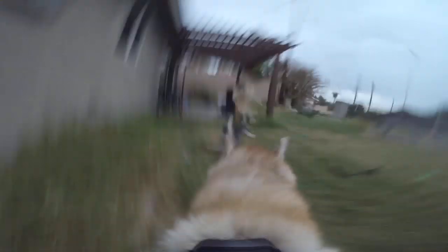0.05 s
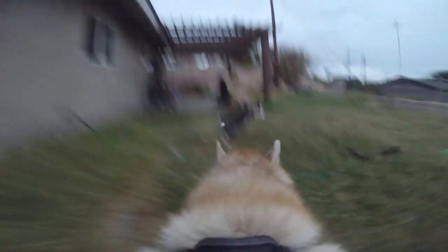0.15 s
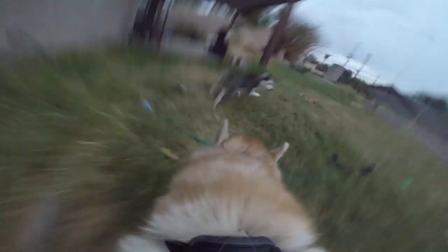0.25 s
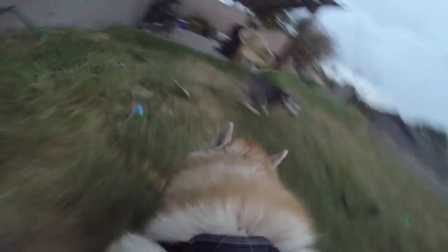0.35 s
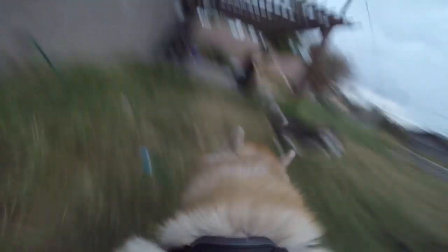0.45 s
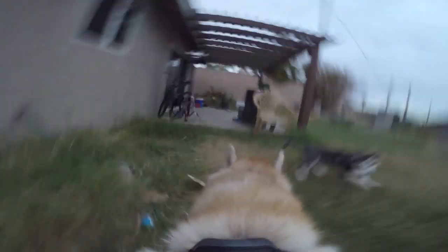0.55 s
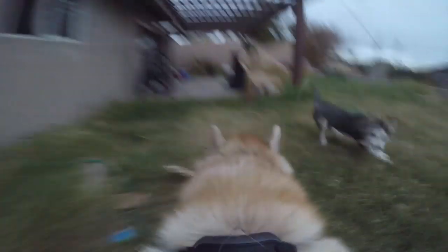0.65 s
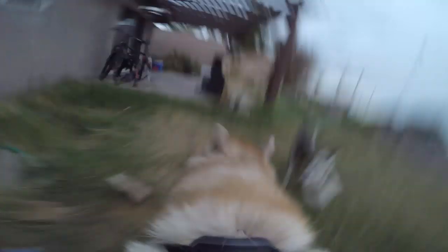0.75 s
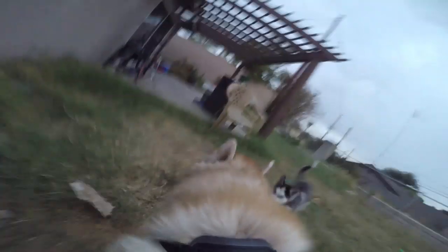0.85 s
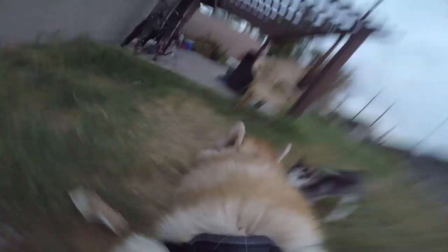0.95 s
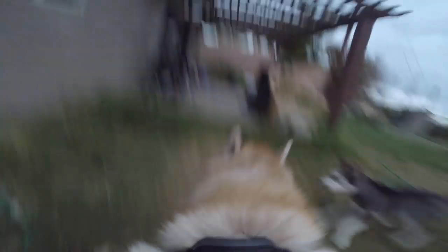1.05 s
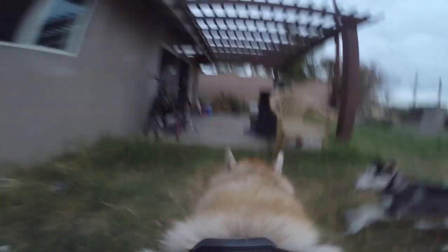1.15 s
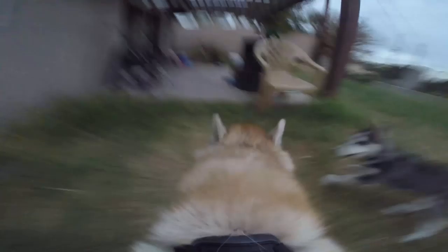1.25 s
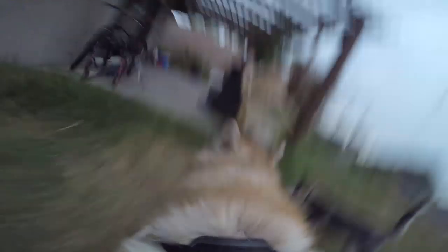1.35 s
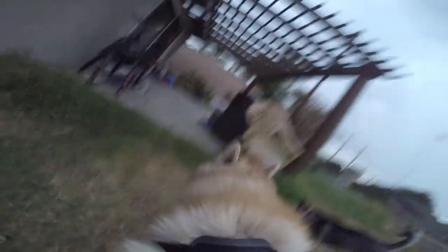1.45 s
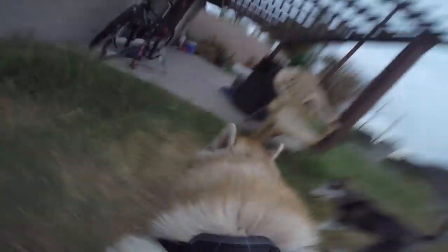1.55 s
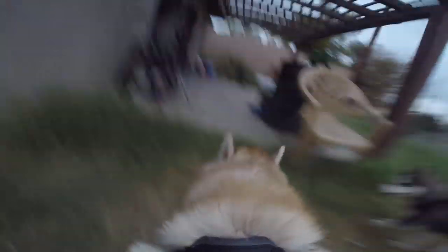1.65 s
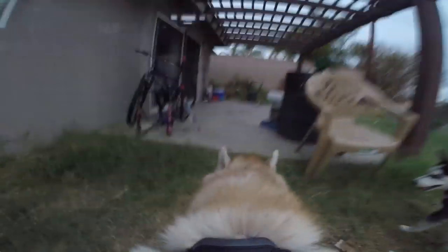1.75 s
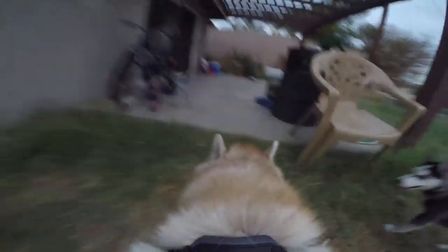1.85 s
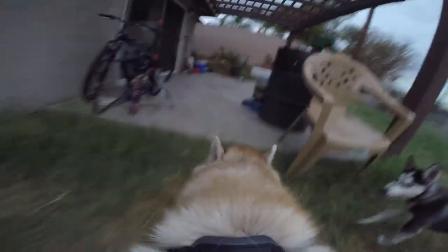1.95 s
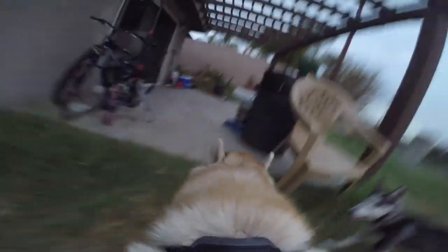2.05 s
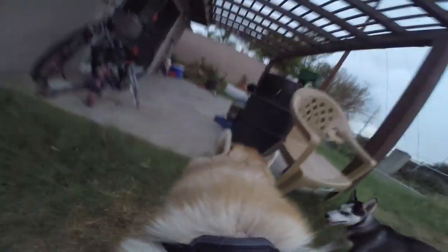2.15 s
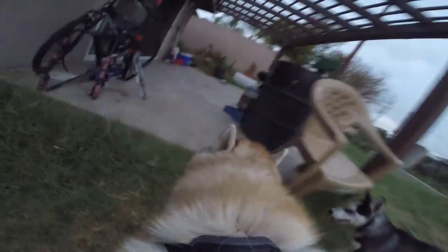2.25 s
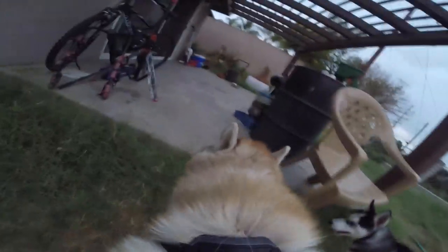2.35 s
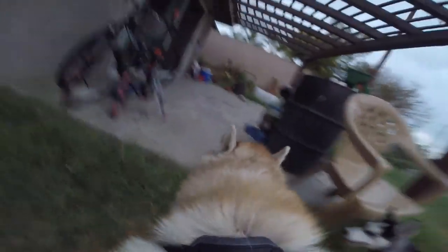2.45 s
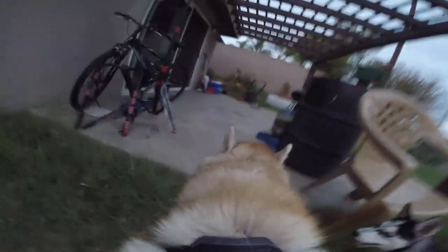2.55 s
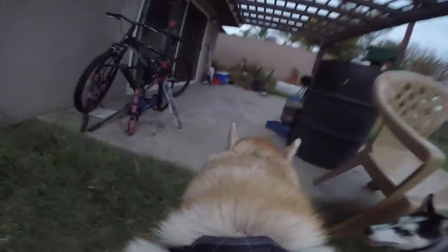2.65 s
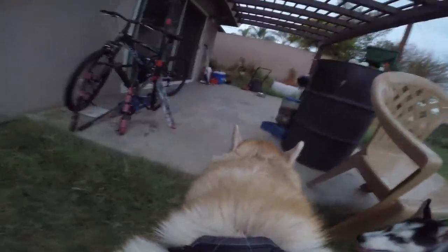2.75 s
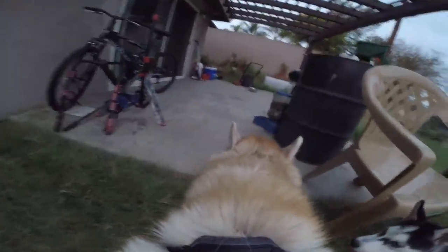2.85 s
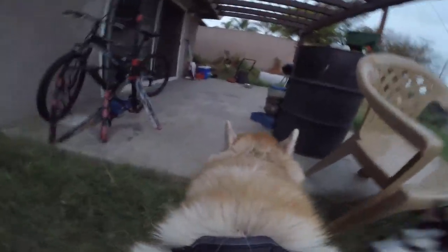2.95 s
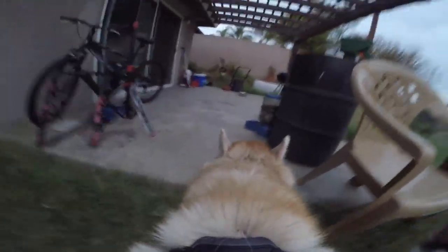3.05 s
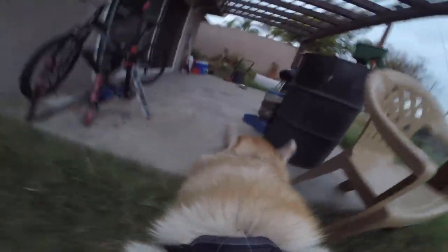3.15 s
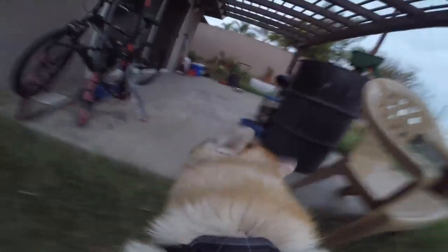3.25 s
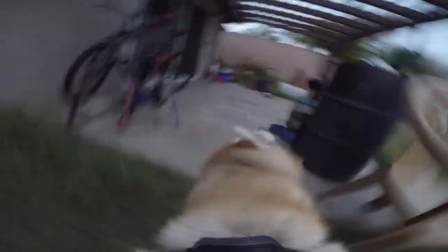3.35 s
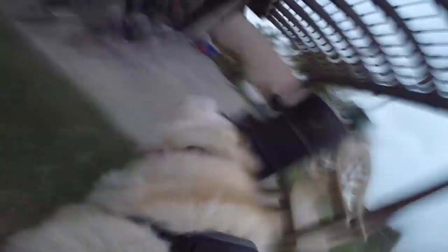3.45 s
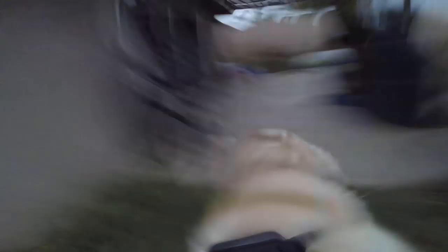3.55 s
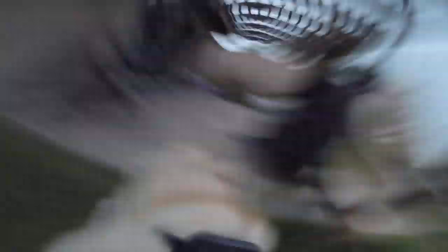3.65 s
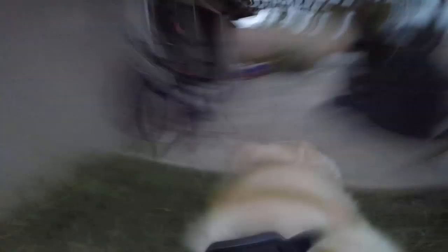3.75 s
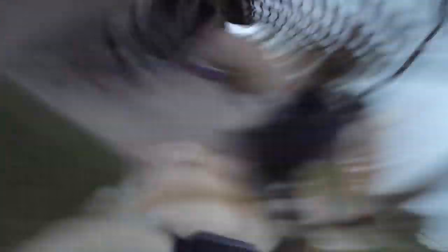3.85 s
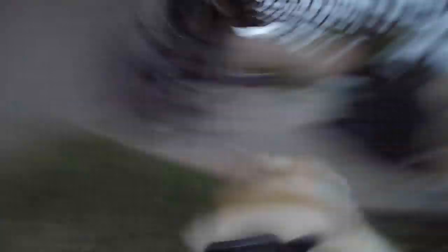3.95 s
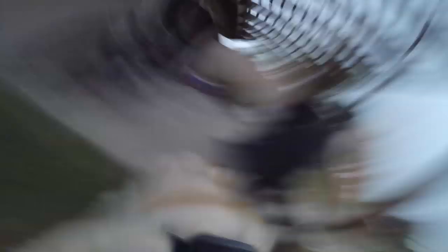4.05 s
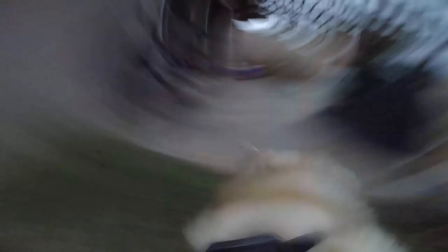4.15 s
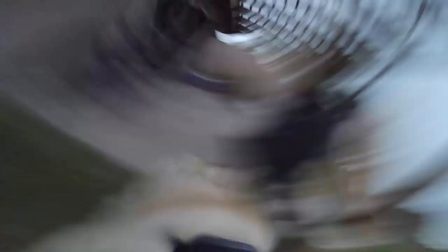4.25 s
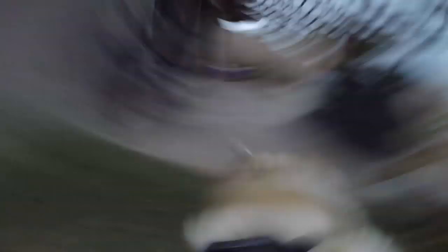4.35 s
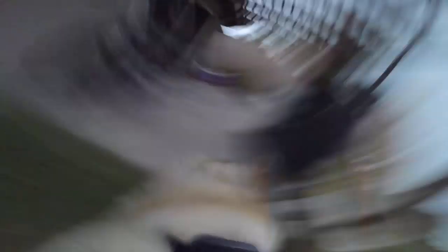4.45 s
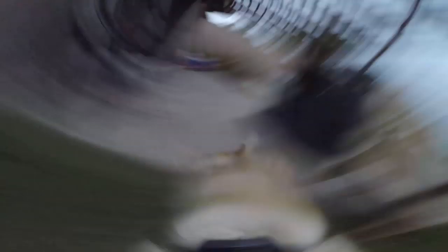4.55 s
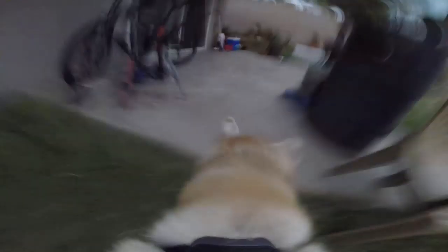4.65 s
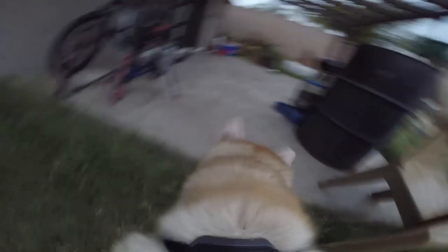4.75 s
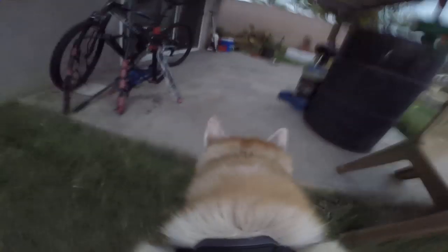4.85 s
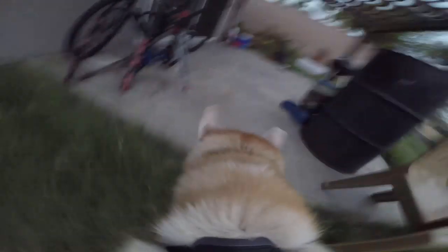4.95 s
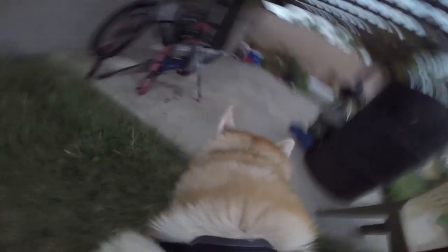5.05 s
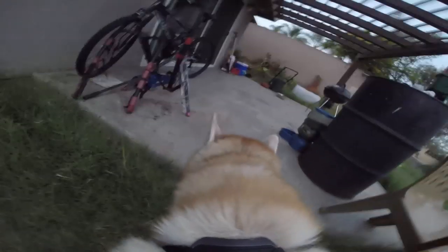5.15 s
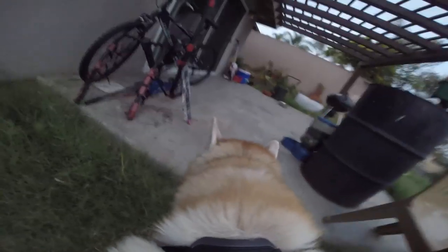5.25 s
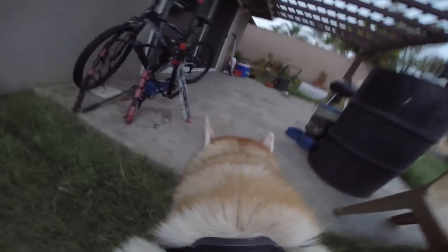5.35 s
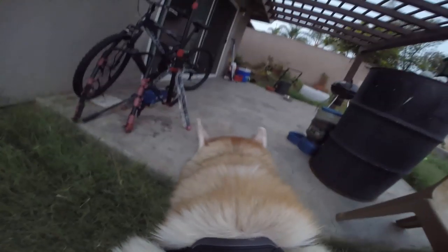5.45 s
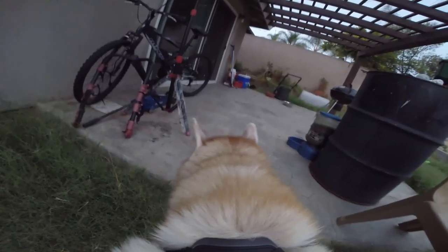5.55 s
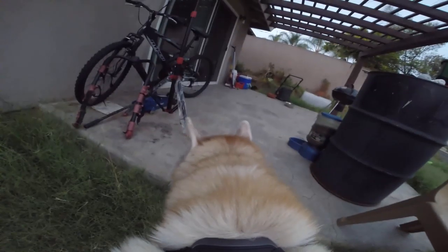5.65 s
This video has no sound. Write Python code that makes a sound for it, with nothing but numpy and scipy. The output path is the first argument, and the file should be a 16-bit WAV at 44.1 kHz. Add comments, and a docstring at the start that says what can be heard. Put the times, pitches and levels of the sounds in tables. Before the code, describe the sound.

Hard plastic knocks and light metal clinks at a dog's stride, a near-quiet pause, then a rapid harness-rattling body shake that quickly settles.

```python
"""Loose camera mount on a dog's harness, knocking on its plastic case right at the microphone, out on a lawn.
The dog runs, stops, then shakes itself: each blow is a click through damped case modes and sets a steel
fitting ringing. Buckles and rings clink as lighter clicks and slide over the case as swells of tiny contacts.
Behind them: grass and fur rustle, air buffeting and rushing on the case, low thuds and one swish, all shaped
noise; faint taps of loose parts; and scattered reflections of the hardware from ground and house wall."""
import sys
import numpy as np
from scipy import signal
from scipy.io import wavfile
from scipy.ndimage import uniform_filter1d, minimum_filter1d

SR = 44100
rng = np.random.default_rng(int(sys.argv[2]) if len(sys.argv) > 2 else 0)


def file_out(sig):
    """Save sig as 16-bit WAV at sys.argv[1]."""
    # one column per channel
    cols = np.atleast_2d(sig).T
    # limit, then scale
    lim = np.clip(cols, -1, 1)
    pcm = np.round(lim * 32767).astype(np.int16)
    wavfile.write(sys.argv[1], SR, pcm)


N = 251189
T = np.arange(N) / SR
CUTOFF_HZ = 10950     # top of the range the camera keeps, owing to its low sampling rate
CONTACT_HZ = 18000    # treble edge of a blow of 0 dB brightness; softer blows push it down


def from_db(db):
    """Decibels to gain."""
    return 10 ** (np.asarray(db) / 20)


def rms(x):
    """Root mean square."""
    return np.sqrt(np.mean(x ** 2) + 1e-20)


def add(track, s, sound):
    """Mix a sound into the track at time s."""
    at = max(round(s * SR), 0)
    track[at:at + len(sound)] += sound[:N - at]


def lowpass(x, hz):
    """Second-order treble cut."""
    return signal.sosfilt(signal.butter(2, hz, fs=SR, output="sos"), x)


def bandpass(x, low_hz, high_hz):
    """Keep what lies between two frequencies."""
    return signal.sosfilt(signal.butter(2, [low_hz, high_hz], "band", fs=SR, output="sos"), x)


def ring(force, hz, t60):
    """A unit click sets a sine of height 1 ringing; it falls 60 dB in t60 seconds."""
    r = np.exp(-np.log(1000) / (t60 * SR))
    w = 2 * np.pi * hz / SR
    return signal.lfilter([0, np.sin(w)], [1, -2 * r * np.cos(w), r * r], force + 1e-18)


def resonance(force, hz, width):
    """Two-pole band-pass with gain 1 on top."""
    r = np.exp(-np.pi * width / SR)
    feed = np.array([1, 0, -1]) * (1 - r * r) / 2
    return signal.lfilter(feed, [1, -2 * r * np.cos(2 * np.pi * hz / SR), r * r], force + 1e-18)


def disperse(force, relative_width=0.63):
    """Bending waves carry the highs faster than the lows, so a click arrives smeared over a millisecond or two."""
    for hz in (950, 1500, 2900, 3300, 4800, 8000):
        force = force - 2 * resonance(force, hz, hz * relative_width)   # an all-pass
    return force


def body(force, modes, bright_db, scatter_db):
    """Damped modes answer a force, neighbours in opposite senses; brightness lifts those above the lowest."""
    out, force = 0, disperse(force)
    for k, (hz, width, db) in enumerate(modes):
        upper = np.interp(hz, [1000, 1500, 2800, 9000], [0, .5, 1, 1.35])   # share of the brightness
        mode_db = db + bright_db * upper + scatter_db * rng.standard_normal()
        out = out + (-1) ** k * from_db(mode_db) * resonance(force, hz, width)
    return out


def shift_modes(modes, detune):
    """Another spot of the case is touched: each mode moves by about this share of its frequency."""
    return [(hz * (1 + detune * rng.standard_normal()), width, db) for hz, width, db in modes]


def blows(rows, modes, hard_db, scatter_db, grit, grit_s, detune=0.011):
    """Each blow is a click followed by a brief, bright grinding; where it lands shifts the modes a little."""
    out, t = np.zeros(N), T[:SR // 20]
    attack = round(.006 * SR)   # the level is set over the first 6 ms
    for s, level_db, bright_db in rows:
        force = grit * np.diff(rng.standard_normal(len(t) + 1)) * np.exp(-t / grit_s)
        force[0] += 1
        force = lowpass(force, min(CONTACT_HZ * from_db(bright_db / 2), .45 * SR))
        sound = body(force, shift_modes(modes, detune), bright_db + hard_db, scatter_db)
        add(out, s, from_db(level_db) * sound / rms(sound[:attack]))
    return out


def drift(per_s):
    """Random wander between knots, per_s of them a second; rms 1."""
    knots = rng.standard_normal(400)
    wander = np.interp(T * per_s % 399, np.arange(400), knots)
    return wander / rms(wander)


def banded_noise(spectrum, patchy_db, flicker_per_s):
    """Half-octave bands of noise, each flickering partly on its own; rms 1."""
    points, out, together = np.array(spectrum), 0, drift(flicker_per_s)
    edges = 20 * 2 ** np.arange(0, 9.6, .5)
    white = rng.standard_normal((2, N))   # neighbouring bands draw on different noise
    for k, (low, high) in enumerate(zip(edges, edges[1:])):
        band = bandpass(white[k % 2], low, high)
        db = np.interp(np.log(low * high) / 2, np.log(points[:, 0]), points[:, 1])
        flicker_db = patchy_db * (together + drift(flicker_per_s))
        out = out + band * from_db(db + flicker_db)
    return out / rms(out)


# the dog runs, then shakes itself and settles: [from t/s, to t/s]
MOVING_SPANS = [(0, 1.87), (3.35, 5.3)]


def moving(s):
    """True while the dog is in motion."""
    return np.any([(s >= start) & (s < end) for start, end in MOVING_SPANS], axis=0)


# air flow past the case, the reference for the three layers below: [t/s, level/dB]
AIR_FLOW = [(0.0, -45.5), (0.22, -48), (0.63, -50.5), (0.78, -56), (0.86, -66), (1.84, -64), (2.38, -53),
            (2.66, -53.5), (3.16, -53), (3.62, -52.5), (3.82, -61), (3.93, -56.5), (4.44, -54.5),
            (4.62, -50), (4.79, -62.5), (5.01, -62), (5.52, -55), (5.7, -46.5)]
# relative spectra of the air's buffeting and rushing: [f/Hz, density/dB per Hz]
BUFFET_SPECTRUM = [(20, 2.5), (55, 2), (100, -1.5), (170, -5), (300, -19.5), (700, -44.5)]
RUSH_SPECTRUM = [(100, -9.5), (190, -6), (265, 2.5), (360, -4), (520, 1), (800, -11.5), (1400, -11.5),
                 (2200, -16.5), (4000, -25), (10000, -35.5)]
# relative spectrum of grass and fur before the hardware colours it: [f/Hz, density/dB per Hz]
RUSTLE_SPECTRUM = [(300, -6.5), (900, 8), (1500, 8), (2100, 5), (3000, -0.5), (4500, -2), (7000, -6.5),
                   (11000, -11.5)]
BUFFET_DB, RUSH_DB = 3.5, -0.5                   # relative to the flow
RUSTLE_MOVING_DB, RUSTLE_STILL_DB = -2, -9.5     # relative to the flow


def background():
    """Air buffets and rushes on the case; grass and fur excite the hardware's modes, more while the dog moves."""
    flow = from_db(np.interp(T, *np.transpose(AIR_FLOW)))
    activity = uniform_filter1d(moving(T).astype(float), size=SR // 5)
    brush = from_db(RUSTLE_STILL_DB + (RUSTLE_MOVING_DB - RUSTLE_STILL_DB) * activity)
    brushing = banded_noise(RUSTLE_SPECTRUM, patchy_db=2.5, flicker_per_s=17)
    rustle = body(brushing, HARDWARE_MODES, 0, 0)
    buffet = from_db(BUFFET_DB) * banded_noise(BUFFET_SPECTRUM, patchy_db=2.0, flicker_per_s=22)
    rush = from_db(RUSH_DB) * banded_noise(RUSH_SPECTRUM, patchy_db=0.77, flicker_per_s=9.8)
    return flow * (buffet + rush + brush * rustle / rms(rustle))


# a soft gliding swish during the run: [t/s, centre f/Hz, level/dB]
SWISH_GLIDE = [(0, 2100, -40), (0.071, 1610, -54), (0.119, 1664, -47), (0.18, 2000, -65), (0.28, 1977, -88)]


def swish(width_hz=170):
    """A narrow band of noise, shifted up to a centre that dips in pitch and rises again."""
    s, hz, db = np.transpose(SWISH_GLIDE)
    narrow = lowpass(rng.standard_normal(N) + 1j * rng.standard_normal(N), width_hz)
    carrier = np.exp(2j * np.pi * np.cumsum(np.interp(T, s, hz)) / SR)
    sound = np.real(narrow * carrier)
    return from_db(np.interp(T, s, db)) * sound / rms(sound)


def jiggle(per_s=18.0, softest_db=-60.5):
    """While the dog moves, loose parts keep tapping faintly, some dull and some bright."""
    draws = rng.random((round(per_s * T[-1]), 3))
    taps = [(u * T[-1], softest_db + 8 * size, -14 + 24 * hard) for u, size, hard in draws]
    taps = [tap for tap in taps if moving(tap[0])]
    return blows(taps, HARDWARE_MODES, hard_db=-6.0, scatter_db=-2.5, grit=0.13, grit_s=0.0012)


# single knocks of the mount against its stop, before the mount's gain: [t/s, level/dB, brightness/dB]
SINGLE_KNOCKS = [(0.0024, -23.5, -6), (0.0843, -30.5, -66), (0.4453, -28.5, -14), (0.4952, -19.5, -5.5),
                 (0.7786, -9.5, 2), (0.9214, -12, 8), (1.0352, -32.5, -9), (1.3566, -12, 7),
                 (1.501, -13, 6.5), (3.4463, -16.5, -34), (3.5405, -26.5, -19), (3.551, -17, -5),
                 (3.5912, -15, 2), (3.7147, -15.5, -7), (4.0172, -21.5, -16), (4.2171, -17, -17.5),
                 (4.3501, -13.5, 1.5), (4.8032, -14, 2), (4.9055, -42.5, -38), (4.9523, -46.5, -36),
                 (5.0477, -34.5, -23), (5.1756, -36.5, -32)]
# the shake: each swing throws the mount against its stop, then the hardware slides across the case:
# [t/s, knock level/dB before the mount's gain, knock brightness/dB, slide length/s, slide level/dB]
SHAKE_SWINGS = [(3.5612, -9, 2, 0.035, -24), (3.645, -13, 2.5, 0.075, -18),
                (3.7541, -15.5, -0.5, 0.063, -23), (3.859, -15, -2.5, 0.036, -19.5),
                (3.961, -15, 0.5, 0.059, -23), (4.0596, -16, -5, 0.05, -16.5),
                (4.167, -14.5, -2, .058, -20.5), (4.262, -18, -10.5, 0.052, -15.5),
                (4.3711, -11.5, -5.5, 0.057, -20.5), (4.4722, -16, -6, 0.042, -17),
                (4.5755, -12, -1, 0.054, -22.5), (4.6771, -13.5, -5.5, .05, -21.5)]
# the mount falls back once after each swing's knock
REBOUND_S, REBOUND_LOSS_DB, REBOUND_DULL_DB = .007, 13.5, 16


def knocks():
    """Single knocks, and a knock with its rebound for each swing: (s, level dB, brightness dB)."""
    rows = list(SINGLE_KNOCKS)
    for s, level_db, bright_db, _, _ in SHAKE_SWINGS:
        rows.append((s, level_db, bright_db))
        rows.append((s + REBOUND_S, level_db - REBOUND_LOSS_DB, bright_db - REBOUND_DULL_DB))
    return rows


# damped modes of the case, struck through the mount, before shift and scatter: [f/Hz, width/Hz, level/dB]
CASE_MODES = [(310, 120, -33.5), (584, 11, -13.5), (896, 94, 5.5), (1032, 62, -0.5), (1398, 250, -1),
              (1519, 110, -3.5), (1732, 16, -14), (1860, 42, -2), (2076, 440, -5), (2445, 65, -10.5),
              (2840, 220, -0.5), (3165, 337, 1.5), (3270, 190, -5), (3680, 130, -8.5), (4490, 170, -6.5),
              (5370, 330, -15), (5280, 360, -28.5), (6970, 250, -18.5), (8000, 830, -29.5),
              (9830, 470, -28), (9900, 180, -32.5)]


def mount():
    """Dry plastic clacks at each hard stride and each turn of the shake."""
    clacks = blows(knocks(), CASE_MODES, hard_db=-0.5, scatter_db=2.97, grit=0.07, grit_s=0.003, detune=0.016)
    return from_db(0.5) * clacks


# ringing modes of the steel fitting: [f/Hz, level/dB, t60/s]
STEEL_MODES = [(1800, 1.5, 0.22), (1893, -3.5, 0.25), (2380, -9.5, 0.094), (2490, -5.5, 0.038),
               (2930, -2, 0.12), (2920, -12, 0.26), (3000, -21, .23), (5750, -25, .2), (5970, -42, .2),
               (9600, -31, .17)]


def steel(touches, knock_db=-25.0, clink_db=-24.0, softness=0.067):
    """Every knock and clink leaves the fitting ringing; soft blows excite it less."""
    force = np.zeros(N)
    for rows, coupling_db in ((knocks(), knock_db), (touches, clink_db)):
        for s, level_db, bright_db in rows:
            add(force, s, from_db([level_db + coupling_db + softness * min(bright_db, 0)]))
    return sum(from_db(db) * ring(force, hz, t60) for hz, db, t60 in STEEL_MODES)


# a buckle or ring touches the case, before the buckles' gain: [t/s, level/dB]
SINGLE_CLINKS = [(0.018, -34.5), (0.1347, -37), (0.158, -35), (0.1697, -33), (0.2433, -35.5),
                 (0.2738, -34.5), (0.642, -30.5), (0.6677, -40.5), (0.731, -37.5), (0.7518, -44.5),
                 (1.147, -46.5), (1.21, -45), (1.227, -48.5), (1.2384, -49), (1.7509, -43.5), (1.8298, -39),
                 (2.3284, -42.5), (2.7348, -44), (3.1154, -46.5), (3.738, -24), (4.7874, -37),
                 (4.8365, -39.5), (4.9157, -38.5), (5.0634, -33), (5.1048, -43.5), (5.2587, -45.5)]
CLINK_BRIGHT_DB, SLACK_BRIGHT_DB, CATCH_BRIGHT_DB = 7, 5, 5   # single, ahead of the knock, within or closing a slide
SLACK_LEAD_S, SLACK_DB = .011, -33.5   # a light touch as the strap tightens, just ahead of the knock
LANDING_COUNT, LANDING_DB = 2, -4      # hard landings within a slide, relative to its closing clink


def clinks():
    """Single clinks; per swing landings and a closing clink, on the smooth side a touch ahead: (s, dB, bright dB)."""
    rows = [(s, level_db, CLINK_BRIGHT_DB) for s, level_db in SINGLE_CLINKS]
    rows += [(swing[0] - SLACK_LEAD_S, SLACK_DB, SLACK_BRIGHT_DB) for swing in SHAKE_SWINGS[::2]]
    for k, (s, _, _, length, slide_db) in enumerate(SHAKE_SWINGS):
        catch_db = slide_db + SWING_SIDES[k % 2][-1]
        rows.append((s + length, catch_db, CATCH_BRIGHT_DB))
        for share in rng.uniform(0.21, .8, LANDING_COUNT):
            rows.append((s + share * length, catch_db + LANDING_DB, CATCH_BRIGHT_DB))
    return rows


# damped modes of the buckles and rings pressed on the case, before shift and scatter:
# [f/Hz, width/Hz, level/dB]
HARDWARE_MODES = [(250, 240, -20.5), (530, 93, -13), (860, 118, -1), (1046, 121, -0.5), (1510, 1000, -20.5),
                  (1797, 200, -8.5), (2060, 180, -10.5), (2394, 170, -9), (2902, 190, -0.5),
                  (3113, 180, -2.5), (3503, 130, -5), (3980, 1600, -13.5), (4400, 260, -9),
                  (4870, 140, -18.5), (5670, 72, -14.5), (6120, 50, -19.5), (6880, 180, -17.5),
                  (6970, 120, -18), (7600, 200, -15.5), (7450, 460, -23), (9200, 150, -14),
                  (9490, 230, -22), (10700, 200, -21.5)]


def buckles(touches):
    """Light, bright touches of metal on the case."""
    return from_db(1.0) * blows(touches, HARDWARE_MODES, hard_db=-2.5, scatter_db=3.5, grit=0.088, grit_s=.0014)


# dull thuds of the paws, carried through the harness: [t/s, level/dB, centre f/Hz]
PAW_THUDS = [(0.25, -38, 109), (0.29, -39.5, 195), (0.335, -42, 130), (0.68, -43, 110), (0.735, -40.5, 150)]
SWAY_S, SWAY_DB, SWAY_HZ = 0.036, -50.5, 184   # the body thuds this long after each swing's knock


def thuds(rise_s=0.0083, relative_width=0.64):
    """Each soft impact of paw or body is a short swell of low noise."""
    out, t = np.zeros(N), T[:SR // 8]
    swell = t / rise_s * np.exp(1 - t / rise_s)
    sways = [(swing[0] + SWAY_S, SWAY_DB, SWAY_HZ) for swing in SHAKE_SWINGS]
    for s, level_db, hz in list(PAW_THUDS) + sways:
        noise = rng.standard_normal(len(t))
        for _ in range(2):
            noise = resonance(noise, hz, hz * relative_width)
        add(out, s, from_db(level_db) * swell * noise * rms(swell) / rms(swell * noise))
    return out


# light skids outside the shake's slides: [start t/s, length/s, level/dB]
LIGHT_SKIDS = [(0.493, 0.062, -41.5), (1.506, 0.041, -49), (3.433, 0.089, -38.5), (4.959, 0.053, -48.5)]
SKID_PEAK_SHARE, SKID_PER_S, SKID_BRIGHT_DB = 0.26, 1500, -9   # share of length, contacts per s, dB
# swings alternate: to one side a late, smooth zip; to the other an early, bouncing slide that ends in a clink:
# [start, peak and end as shares of the slide length, contacts per s, brightness/dB, closing clink/dB over slide]
SWING_SIDES = [(-.05, .65, 1.23, 4185, 1, -14.5), (.05, 0.41, 1.253, 1943, -0.77, -3)]


def slides():
    """Light skids, and a slide for each swing: (start s, peak s, end s, level dB, contacts per s, brightness dB)."""
    rows = []
    for s, length, level_db in LIGHT_SKIDS:
        rows.append((s, s + SKID_PEAK_SHARE * length, s + length, level_db, SKID_PER_S, SKID_BRIGHT_DB))
    for k, (s, _, _, length, slide_db) in enumerate(SHAKE_SWINGS):
        start, peak, end, per_s, bright_db, _ = SWING_SIDES[k % 2]
        rows.append((s + start * length, s + peak * length, s + end * length, slide_db, per_s, bright_db))
    return rows


def bounces(t, gap_s, fade_s):
    """Loose metal bounces at uneven intervals; each landing sets off a brief flurry."""
    landings = np.cumsum(gap_s * rng.uniform(.4, 1.6, 100)) - gap_s * 2
    strength = rng.uniform(.5, 1, 100)
    last = np.maximum(np.searchsorted(landings, t) - 1, 0)
    return strength[last] * np.exp(-np.abs(t - landings[last]) / fade_s)


SLIDE_DETUNE = .025   # each slide runs over another spot of the case


def chatter(edge_db=-24.0, spread_db=4.0, scatter_db=2.5, direct_db=-20.5, direct_hz=1500):
    """Hardware dragged over the case: a swell of tiny contacts, heard through the modes and directly."""
    out, t = np.zeros(N), T[:SR // 5]
    from_peak = t - t[-1] / 2
    for start, peak, end, level_db, per_s, bright_db in slides():
        chance, size = rng.random(len(t)), rng.standard_normal(len(t))
        sizes = from_db(spread_db * np.minimum(size, 1))
        force = (chance < per_s / SR) * sizes * rng.choice([-1, 1], len(t))
        # a fast skid is a smooth zip, a slow one breaks into bounces
        looseness = min((3400 / per_s) ** 2, 5)
        force = force * (1 + looseness * bounces(t, gap_s=.006, fade_s=.0012))
        crackle = bandpass(force, direct_hz, CUTOFF_HZ)
        through_modes = body(force, shift_modes(HARDWARE_MODES, SLIDE_DETUNE), bright_db, scatter_db)
        sound = through_modes + from_db(direct_db + bright_db) * crackle
        # the swell is down by edge_db at the start and end of the slide
        reach_s = np.where(from_peak < 0, max(peak - start, .005), max(end - peak, .005))
        swell = from_db(edge_db * (from_peak / reach_s) ** 2)
        add(out, peak - t[-1] / 2, from_db(level_db) * swell * sound * rms(swell) / rms(swell * sound))
    return out


def yard(x, t60=0.14, dull_hz=2800):
    """Scattered reflections from the ground and the house wall: dulled noise that dies away."""
    t = T[:SR // 4]
    echo = rng.standard_normal(len(t)) * np.exp(-np.log(1000) * t / t60) * (1 - np.exp(-t / 0.003))
    echo = lowpass(echo, dull_hz)
    return signal.fftconvolve(x, echo / np.sqrt(np.sum(echo ** 2)))[:N]


def scene():
    """The harness hardware right at the microphone, over the background."""
    touches = clinks()
    hardware = mount() + buckles(touches) + chatter() + steel(touches)
    reflections = from_db(-38.5) * yard(hardware)
    return (hardware + reflections + thuds() + background() + swish() + jiggle())[None]


def record(dry, release_db_per_s=1800):
    """A fast limiter holds the hardest knocks just below full scale; the top is cut."""
    top_cut = signal.cheby1(18, .3, CUTOFF_HZ, fs=SR, output="sos")
    level_db = 20 * np.log10(np.abs(signal.sosfilt(top_cut, dry)) + 1e-9)
    over_db = np.maximum(level_db + .3, 0)   # the ceiling is -0.3 dB
    release = release_db_per_s * T
    held_db = np.maximum.accumulate(over_db + release, axis=-1) - release
    # the gain dips slightly ahead of each peak, with rounded corners
    gain = uniform_filter1d(minimum_filter1d(from_db(-held_db), size=41), size=21)
    return signal.sosfilt(top_cut, dry * gain)


dry = scene()
out = record(dry)
file_out(out)
```